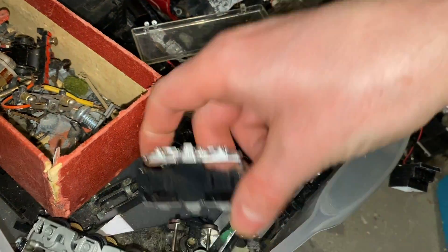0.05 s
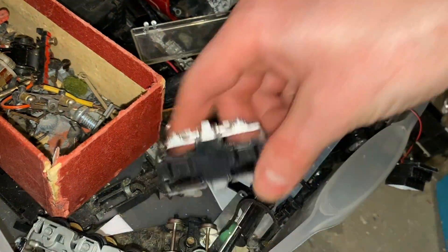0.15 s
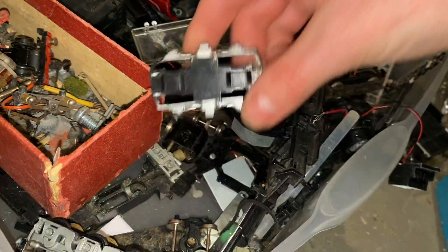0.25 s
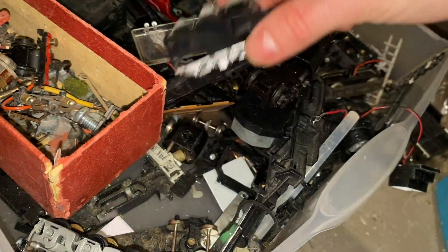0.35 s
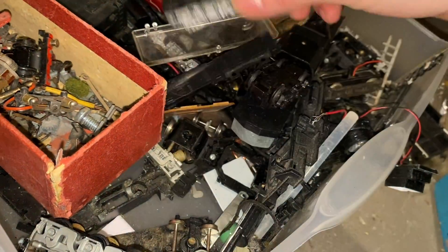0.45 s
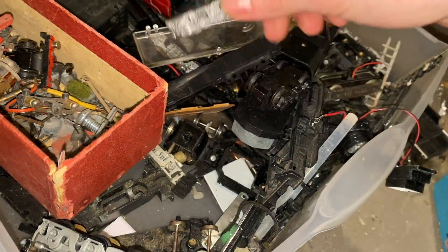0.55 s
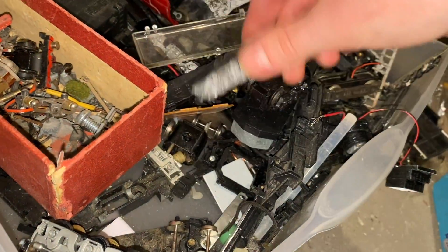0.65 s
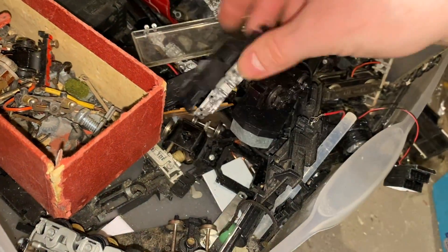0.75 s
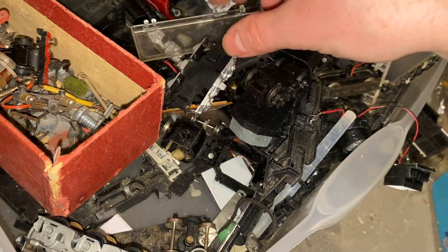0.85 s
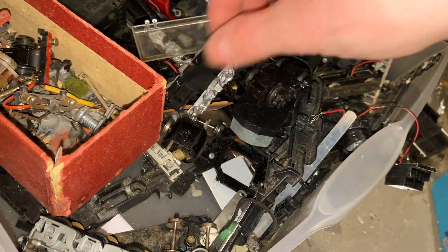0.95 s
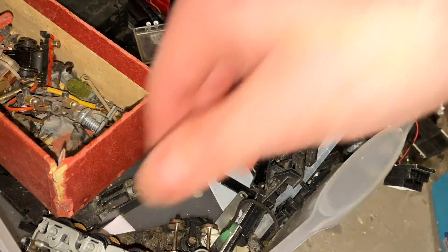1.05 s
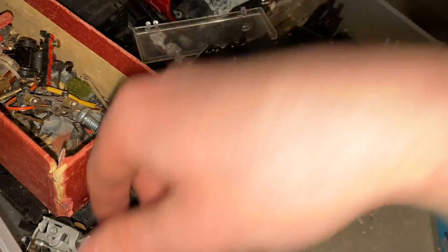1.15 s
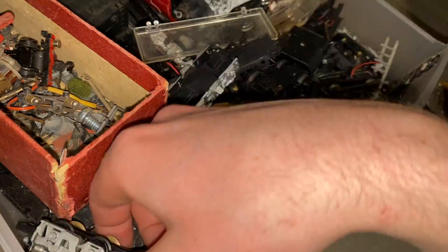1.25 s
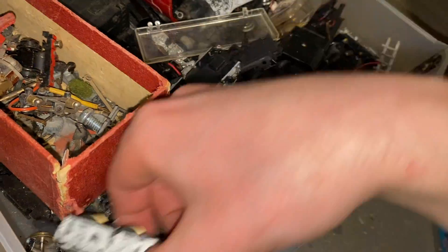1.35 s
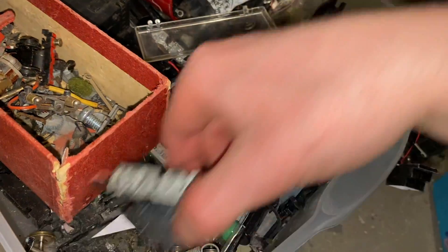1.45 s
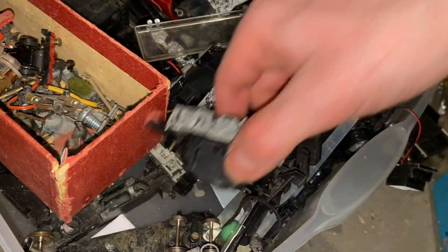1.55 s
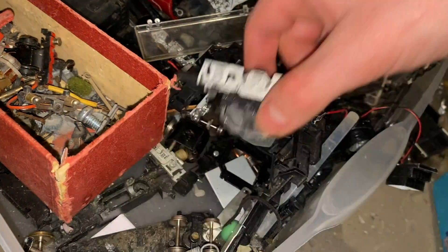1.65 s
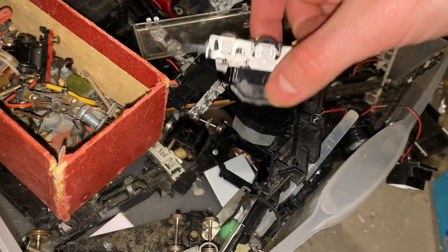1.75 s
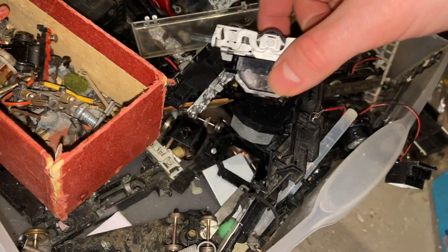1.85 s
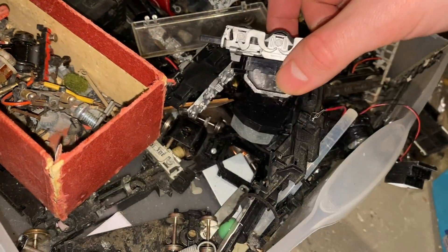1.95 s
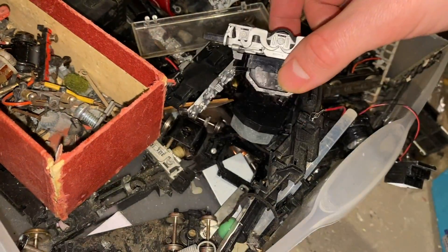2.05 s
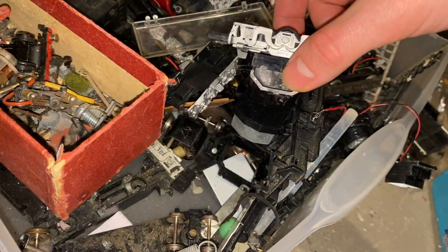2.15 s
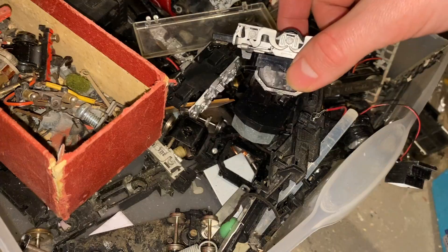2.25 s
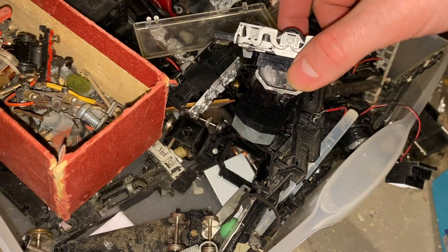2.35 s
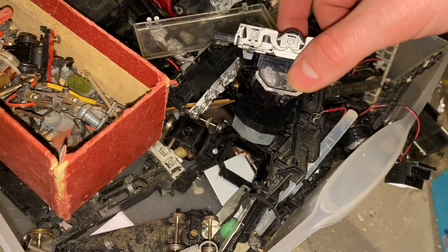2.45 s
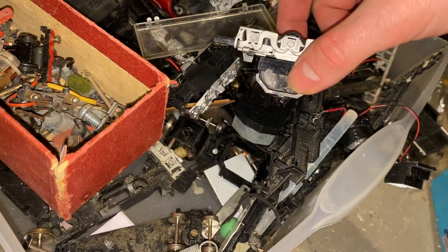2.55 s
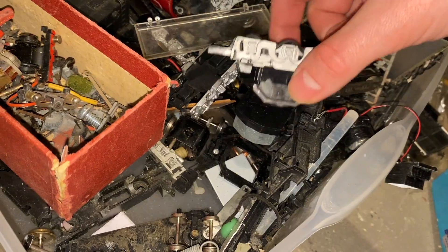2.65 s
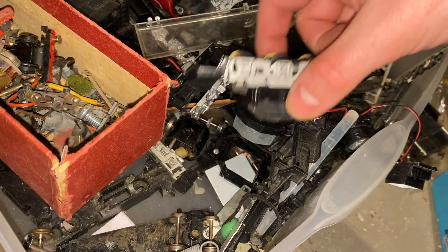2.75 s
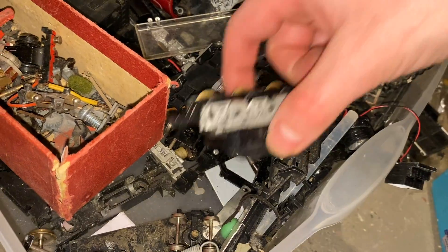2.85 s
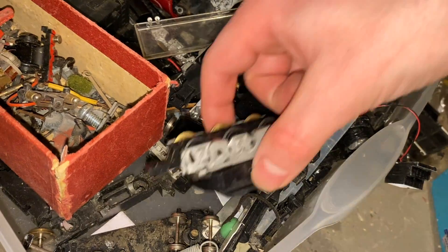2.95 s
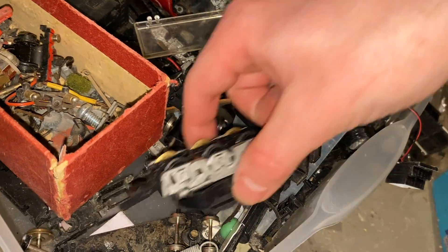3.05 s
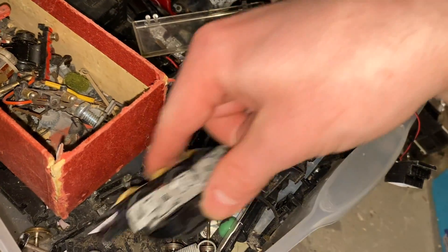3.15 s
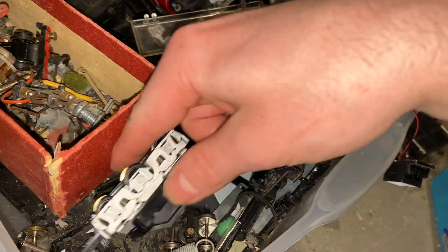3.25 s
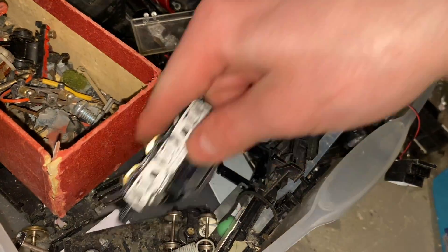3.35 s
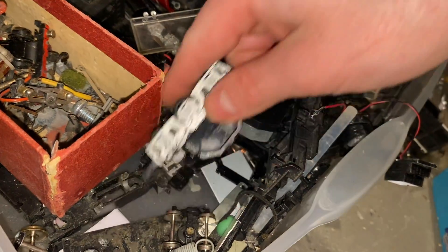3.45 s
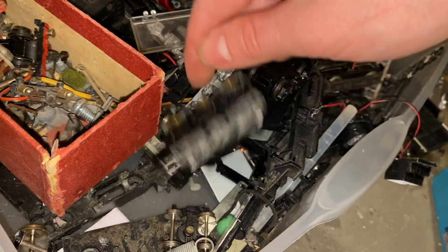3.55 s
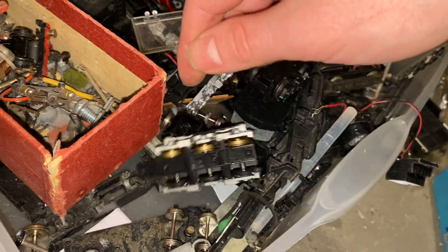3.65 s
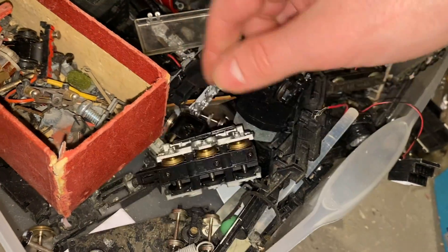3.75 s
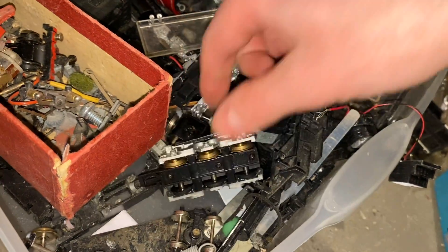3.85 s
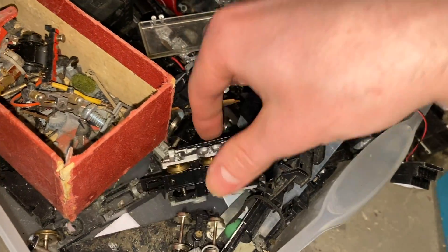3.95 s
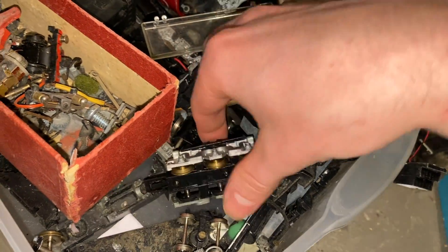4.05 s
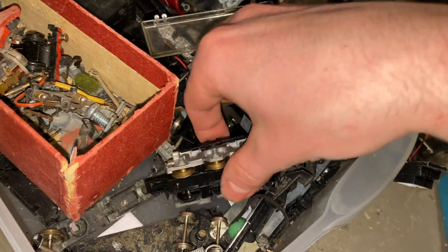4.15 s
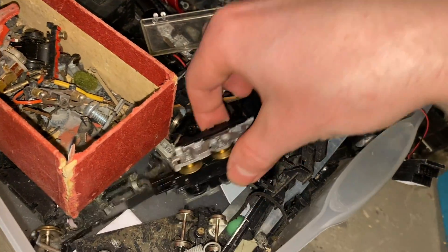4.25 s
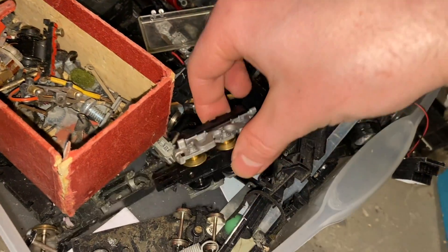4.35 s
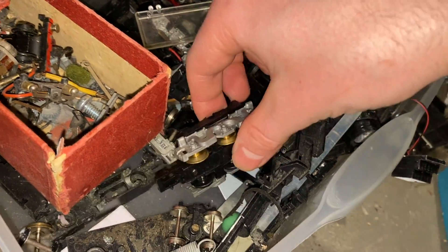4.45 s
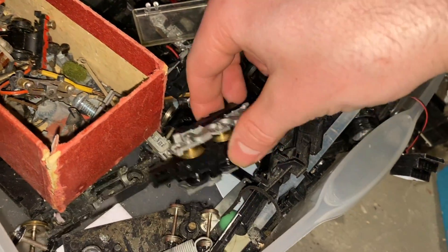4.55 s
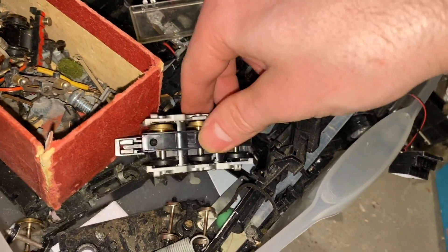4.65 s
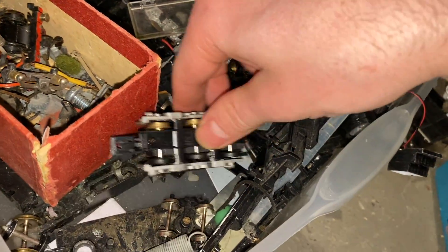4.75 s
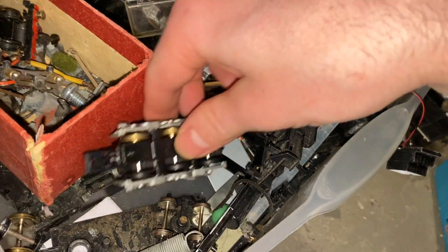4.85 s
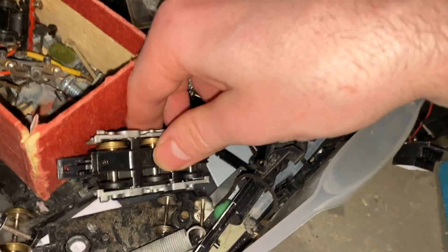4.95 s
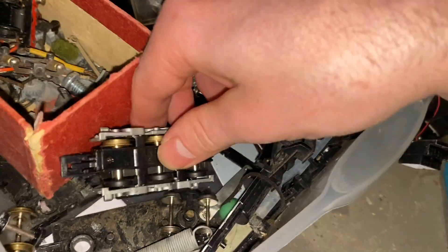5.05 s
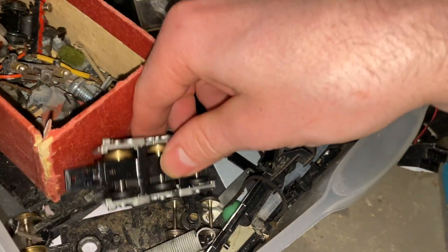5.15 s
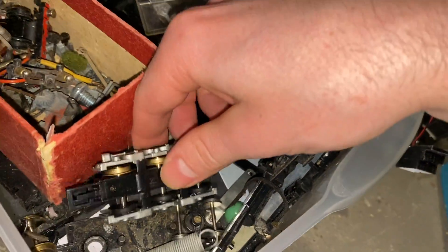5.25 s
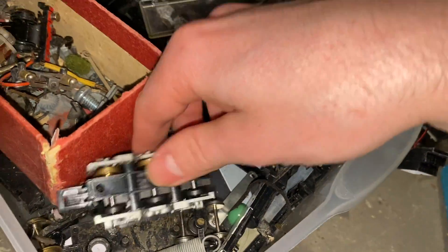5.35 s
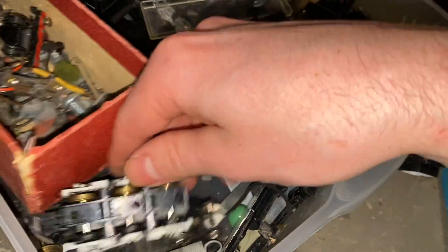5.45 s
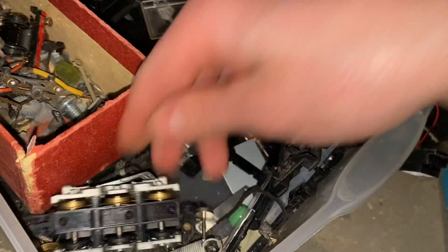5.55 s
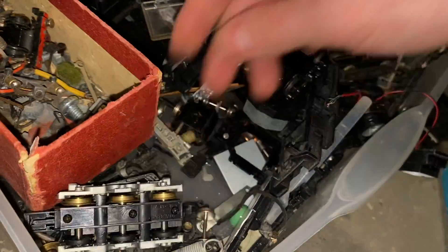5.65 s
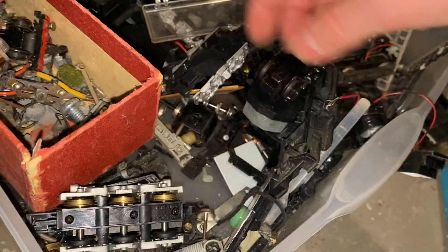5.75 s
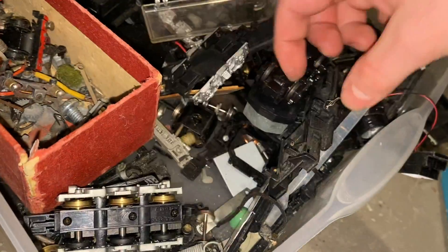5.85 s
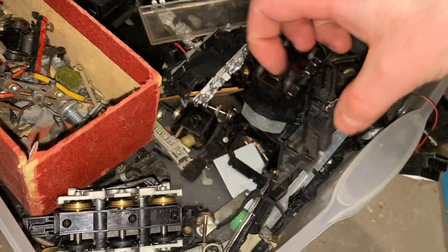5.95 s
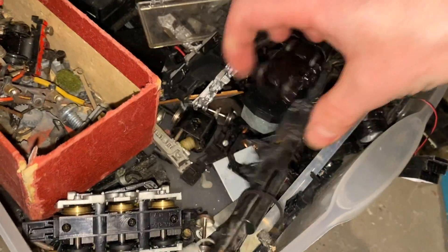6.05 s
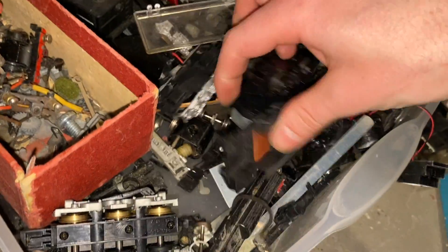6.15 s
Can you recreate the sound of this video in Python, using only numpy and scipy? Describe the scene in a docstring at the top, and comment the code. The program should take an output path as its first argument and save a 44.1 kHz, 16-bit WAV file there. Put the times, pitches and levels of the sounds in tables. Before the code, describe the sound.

A hand rummages through a bin of small plastic parts, clattering and sliding, with metal wheels chinking and one hard knock midway.

```python
"""Over low rumble, hum and hiss in a small quiet room, a hand rummages in a plastic bin of small parts.
First plastic pieces clatter and slide, a strip is flicked, and loose metal wheels begin to chink.
After a lull of over a second a model-train wheel unit is set down hard at about 3.5 s; a panel hums on.
Sparse touches follow, then a dense flurry of plastic and wheels from about 5.2 s to the end.
Contacts excite decaying modes and noise bursts; strokes add stick-slip friction; the room reverberates."""
import sys
import numpy as np
from scipy import signal
from scipy.fft import rfft, irfft, next_fast_len
from scipy.io import wavfile
from scipy.ndimage import uniform_filter1d

SR = 44100
rng = np.random.default_rng(int(sys.argv[2]) if len(sys.argv) > 2 else 0)


def dump(signal):
    """Clip the signal to [-1, 1] and save it as 16-bit WAV at the path in sys.argv[1]."""
    limited = np.clip(np.atleast_2d(signal).T, -1, 1)
    pcm = np.round(limited * 32767).astype(np.int16)
    wavfile.write(sys.argv[1], SR, pcm)


N = 274302
T = np.arange(SR // 5) / SR  # time within one contact [s]
BLOW = SR // 100  # a contact's level is its rms over these first samples (10 ms)


def amp(db):
    """Level to amplitude: 20 dB is a factor of ten."""
    return 10 ** (np.asarray(db) / 20)


def unit(x):
    """Normalisation by effective value: scale to rms 1."""
    return x / np.sqrt(np.mean(x ** 2) + 1e-20)


def blow(x):
    """Normalisation by onset: scale a contact so that its first 10 ms have rms 1."""
    return x / np.sqrt(np.mean(x[:BLOW] ** 2) + 1e-20)


def fade(t, t60):
    """Exponential damping: the amplitude falls by 60 dB in t60 seconds."""
    return np.exp(-np.log(1000) * t / t60)


def rise(t, attack):
    """Finite contact time: a contact builds up with the time constant attack [s]."""
    return 1 - np.exp(-t / attack)


def along(points, hz):
    """Logarithmic frequency scale: (Hz, value) points joined by straight lines on it."""
    f, v = np.transpose(points)
    return np.interp(np.log(hz + 1e-3), np.log(f), v)


def coloured(x, spectrum):
    """Linear filtering: x weighted by a (Hz, dB) curve, then scaled to rms 1."""
    m = next_fast_len(len(x) + SR // 5)  # zero padding against wrap-around
    gain = amp(along(spectrum, np.fft.rfftfreq(m, 1 / SR)))
    return unit(irfft(rfft(x, m) * gain, m)[:len(x)])


def add(track, s, sound):
    """Superposition: mix a sound in at time s [s]."""
    start = max(round(s * SR), 0)
    track[start:start + len(sound)] += sound[:max(len(track) - start, 0)]


def ring(modes, scatter_db, tilt_db=0, detune=0):
    """Modal superposition: damped modes of alternating sign, with new strengths and loading at each blow."""
    hz, db, t60 = np.transpose(modes)
    hz = hz * np.exp(detune * rng.standard_normal(len(hz)))
    sign = (-1) ** np.arange(len(hz))
    gain = amp(db + tilt_db + scatter_db * rng.standard_normal(len(hz))) * sign
    return gain @ (np.sin(2 * np.pi * hz[:, None] * T) * fade(T, t60[:, None]))


def rattled(modes, rattle_t60, detune, scatter_db=3):
    """Excitation by convolution: a loose piece rattles on its seat for a moment, feeding its modes."""
    rattle = rng.standard_normal(4 * BLOW) * fade(T[:4 * BLOW], rattle_t60)
    return blow(signal.fftconvolve(ring(modes, scatter_db, detune=detune), rattle))


# spectra of the low rumble and the thin hiss: (frequency [Hz], relative density [dB per Hz])
RUMBLE_SPECTRUM = [(2, 5), (6, 5), (16, 7), (32, -17), (55, -2.5), (85, -10), (130, -7), (168, -19.5),
                   (200, -18.5), (300, -26), (600, -31.5), (1200, -54.5), (3000, -86)]
HISS_SPECTRUM = [(200, -8), (600, 9.5), (1200, 7.5), (2500, 1), (5000, -1), (10000, -5.5), (16000, -7.5)]
# steady hum tones: (frequency [Hz], rms level [dB])
HUM_TONES = [(59.5, -56.5), (199, -65), (2724, -85)]


def background(rumble_db=-43.0, hiss_db=-69):
    """Stationary noise and pure tones: low room rumble, thin hiss and a faint hum."""
    t = np.arange(N) / SR
    hum = sum(amp(db) * np.sqrt(2) * np.sin(2 * np.pi * (hz * t + rng.random())) for hz, db in HUM_TONES)
    rumble = amp(rumble_db) * coloured(rng.standard_normal(N), RUMBLE_SPECTRUM)
    hiss = amp(hiss_db) * coloured(rng.standard_normal(N), HISS_SPECTRUM)
    return hum + rumble + hiss


# reverberation time of the room: (frequency [Hz], t60 [s])
ROOM_T60 = [(200, 0.097), (600, 0.36), (2000, 0.32), (7000, 0.22), (15000, 0.14)]
# strength of its reply to the direct sound: (frequency [Hz], gain [dB])
ROOM_REPLY = [(200, -9.5), (600, -8.5), (1300, -8), (2500, -13), (7000, -14.5), (15000, -17.5)]


def room(x, delay=.008, order=10):
    """Reverberation as decaying noise: the walls answer, a little differently as the hand moves about."""
    hop = N // order // 2
    window = signal.windows.hann(2 * hop, sym=False)
    padded = np.pad(x, (hop, 3 * hop))
    wet = np.zeros(len(padded))
    # overlapping stretches of sound each get a new random tail
    for start in range(0, N + hop, hop):
        hz, t, z = signal.stft(rng.standard_normal(SR // 2), SR, nperseg=256)
        decay = fade(t, along(ROOM_T60, hz)[:, None])
        energy = np.mean(decay ** 2, axis=1, keepdims=True) * SR / 2
        decay *= amp(along(ROOM_REPLY, hz))[:, None] / np.sqrt(energy)
        tail = signal.istft(z * decay, SR, nperseg=256)[1]
        stretch = padded[start:start + 2 * hop] * window
        add(wet, start / SR + delay, signal.fftconvolve(stretch, tail))
    return wet[hop:hop + N]


STROKE_EDGE_DB = -10.5  # a stroke starts and ends this far under its peak


def pressure_db(t, swell_s, fade_s):
    """Friction grows with load: the hand presses harder, then lets go; t counts from the stroke's start."""
    return STROKE_EDGE_DB * np.maximum(1 - t / swell_s, (t - swell_s) / fade_s)


def jostle(spread_db=3, t60=0.017, low_hz=700, high_hz=6000, count=8000):
    """Granular superposition: countless tiny contacts, each ringing one short mode of some piece."""
    hz = low_hz * (high_hz / low_hz) ** rng.random((count, 1))
    t = T[:2 * BLOW]
    # high modes lie further apart; their strength keeps the spectrum even
    size = amp(spread_db * np.clip(rng.standard_normal((count, 1)), -2, 2)) * np.sqrt(hz)
    grains = size * np.sin(2 * np.pi * hz * t) * fade(t, t60)
    at = rng.integers(0, N, (count, 1)) + np.arange(len(t))
    return np.bincount(at.ravel(), grains.ravel(), N)[:N]


# spectrum of plastic rubbing on plastic: (frequency [Hz], relative density [dB per Hz])
RASP_SPECTRUM = [(500, -20.5), (900, 1.5), (1700, 5.5), (2600, 6), (4500, 4.5), (8000, 2), (12000, -3.5),
                 (16000, -22)]
# plastic pieces slide over each other:
# (start [s], swell [s], fade [s], bin gain at peak [dB], rasp gain at peak [dB])
SLIDES = [(0.0, 0.031, .1, -43, -46), (0.21, 0.068, 0.026, -58, -57), (0.61, 0.16, 0.15, -52.5, -55.5),
          (3.21, .05, 0.038, -61, -59.5), (4.74, 0.026, 0.069, -61, -65), (5.03, .07, .1, -47.5, -60),
          (5.86, 0.15, .06, -46, -48.5), (6.03, 0.12, 0.05, -35.5, -38)]
# the wheel unit is dragged across them: the same columns
DRAGS = [(1.18, 0.083, 0.042, -44, -54.5), (1.359, 0.054, 0.11, -45, -45.5),
         (3.335, 0.035, 0.032, -61.5, -59.5), (3.48, 0.054, 0.097, -43, -38.5),
         (5.23, 0.07, 0.087, -48.5, -52.5), (5.36, 0.043, 0.14, -40, -43)]


def scrapes(slips_per_s=700, spread_db=4, slip_t60=0.06, jostle_db=-1, friction_db=-3):
    """Stick-slip friction: sliding pieces hiss, jostle each other and drum faintly on the bin."""
    t, out = np.arange(N) / SR, np.zeros(N)
    slipping = rng.random(N) < slips_per_s / SR
    slips = slipping * amp(spread_db * rng.standard_normal(N)) * rng.choice([-1, 1], N)
    # each slip leaves a burst of friction noise that dies away
    grip = np.sqrt(np.abs(signal.fftconvolve(slips ** 2, fade(T, slip_t60) ** 2)[:N]))
    friction = coloured(grip * rng.standard_normal(N), RASP_SPECTRUM)
    rasp = amp(jostle_db) * coloured(jostle(), RASP_SPECTRUM) + amp(friction_db) * friction
    # in the drumming the bin's modes are tilted upwards by 2.9 dB per octave
    tilt_db = 2.9 * np.log2(np.array(BIN_MODES)[:, 0])
    body = unit(signal.fftconvolve(slips, ring(BIN_MODES, scatter_db=6.5, tilt_db=tilt_db))[:N])
    for start, swell_s, fade_s, bin_db, rasp_db in SLIDES + DRAGS:
        on = (t >= start) & (t < start + swell_s + fade_s)
        pressure = amp(pressure_db(t[on] - start, swell_s, fade_s))
        pressure = uniform_filter1d(pressure, BLOW, mode="constant")  # soften the stroke's edges
        out[on] += pressure * (amp(bin_db) * body[on] + amp(rasp_db) * rasp[on])
    return out


# a thin plastic panel is jolted and hums on: (time [s], level [dB])
PANEL_HITS = [(3.159, -53), (3.512, -47), (3.539, -33.5), (4.567, -46.5)]
# its modes: (nominal frequency [Hz], mean relative level [dB], t60 [s])
PANEL_MODES = [(970, -3.5, 0.12), (990, 6, 0.16), (1090, -5, 0.22), (1120, -4, .2), (1220, -9.5, 0.39),
               (1343, 11.5, 0.17), (1415, -1.5, 0.17), (1463, -3, 0.36), (1520, 1, 0.21),
               (1640, -10.5, .12), (1740, -9.5, .1)]


def panel():
    """Plate resonance: a jolt rattles the thin panel, whose modes ring on."""
    out = np.zeros(N)
    for s, db in PANEL_HITS:
        add(out, s, amp(db) * rattled(PANEL_MODES, rattle_t60=0.031, detune=0.022))
    return out


# a long stiff strip is flicked and rings on: (time [s], level of its modes [dB])
STRIP_HITS = [(.771, -31), (0.836, -46), (5.892, -43), (5.935, -45.5)]
# its modes: (frequency [Hz], mean relative level [dB], t60 [s])
STRIP_MODES = [(1610, -1.5, 0.08), (1770, -8.5, 0.21), (1760, -19, 0.055), (1714, -9, 0.066),
               (2220, -13, 0.18), (2480, -4, 0.043), (2558, -3.5, 0.13), (2586, -0.5, 0.058),
               (3290, -33, 0.056), (3650, -16, 0.093), (4140, -10, 0.084), (5190, -13, 0.16),
               (6400, -11.5, 0.1), (7870, -11, 0.066), (8500, -22, .05), (11200, -23, .05)]


def strip(neighbours_db=-7):
    """Bar vibration with contact buzz: the flicked strip quivers against the pieces that it lies on."""
    out = np.zeros(N)
    for s, db in STRIP_HITS:
        buzz = blow(coloured(rng.standard_normal(len(T)), RASP_SPECTRUM) * fade(T, t60=0.11))
        add(out, s, amp(db) * (blow(ring(STRIP_MODES, scatter_db=3.5)) + amp(neighbours_db) * buzz))
    return out


# an axle rings when the unit lands: (time [s], level [dB])
AXLE_HITS = [(3.540, -48), (5.358, -29.5), (5.412, -56)]
# its single mode: (frequency [Hz], relative level [dB], t60 [s])
AXLE_MODES = [(5108, 0, .09)]


def axle():
    """Free decay of a single mode: the metal axle rings after its blow."""
    out = np.zeros(N)
    for s, db in AXLE_HITS:
        add(out, s, amp(db) * blow(ring(AXLE_MODES, scatter_db=1)))
    return out


# modes of the loaded bin: (nominal frequency [Hz], relative level before weighting [dB], t60 [s])
BIN_MODES = [(201, -17.5, 0.042), (247, 0.5, 0.039), (285, 0.5, 0.059), (352.6, 4, 0.033),
             (422.7, -0.5, 0.064), (496.4, -0.5, 0.049), (668, -1, 0.045), (736, 0.5, 0.042),
             (843.6, 0.5, 0.043), (984.4, -8.5, 0.048)]


def knock(centre_hz, focus_db=9.5, attack=0.00042, cut_hz=170):
    """Modal excitation by impact: the bin modes near a centre pitch, set by where the piece lands, dominate."""
    octaves = np.log2(np.array(BIN_MODES)[:, 0] / centre_hz)
    modes = ring(BIN_MODES, scatter_db=1.5, tilt_db=-focus_db * octaves ** 2, detune=.025)
    low_cut = signal.butter(3, cut_hz, "high", fs=SR, output="sos")  # the knock carries little deep bass
    return blow(signal.sosfilt(low_cut, modes * rise(T, attack)))


def clack(centre_hz, focus_db=2.5, t60=0.042, low_hz=950, high_hz=7500, attack=0.00043, count=60):
    """Dense modal response: each plastic piece has its own short modes, strongest around its pitch."""
    hz = low_hz * (high_hz / low_hz) ** ((np.arange(count) + rng.random(count)) / count)
    # high modes tend to die sooner
    life = t60 * (hz / centre_hz) ** -.3 * np.exp(.35 * rng.standard_normal(count))
    gain = amp(-focus_db * np.log2(hz / centre_hz) ** 2)
    t = T[:len(T) // 2]
    waves = np.sin(2 * np.pi * (hz[:, None] * t + rng.random((count, 1))))
    modes = gain @ (waves * fade(t, life[:, None]))
    return np.pad(blow(modes * rise(t, attack)), (0, len(T) - len(t)))


def chatter(x, span, rebound, count=3):
    """Repeated impact: a light piece rebounds a few times within milliseconds of touching."""
    out = x.copy()
    for when, size in rng.random((count, 2)):
        add(out, span * when, rebound * (2 * size - 1) * x)
    return out


# snap of a plastic edge and of a metal one: (frequency [Hz], mean relative density [dB per Hz])
PLASTIC_EDGE = [(2500, -28), (4500, -1.5), (6500, 2.5), (8500, 2), (11000, -3), (13500, -3), (16000, -21.5)]
METAL_EDGE = [(2500, -28.5), (4500, -7.5), (6500, -4.5), (8200, 1.5), (10500, -7.5), (13200, 0.5),
              (14500, -7), (16000, -8)]


def tick(spectrum, t60=0.027, after_db=-21, after_t60=0.13, attack=0.00057, count=22):
    """Broadband impact noise: hard edges snap and rebound, and neighbouring pieces shiver briefly."""
    # each snap has its own colour
    hz = np.linspace(spectrum[0][0], spectrum[-1][0], count)
    own_db = along(spectrum, hz) + 3 * rng.standard_normal(count)
    snap = chatter(fade(T, t60) * rise(T, attack), span=0.0051, rebound=0.76)
    shiver = amp(after_db) * fade(T, after_t60) * rise(T, attack)
    return blow(coloured(rng.standard_normal(len(T)), np.c_[hz, own_db]) * (snap + shiver))


# the harder the edge (tick over clack), the higher the clack
CLACK_HZ, BRIGHTEN_OCT_PER_DB = 3130, 0.0961


def touch(knock_db, knock_hz, clack_db, tick_db, edge, count):
    """Coupled impact: a touch sounds the bin, a plastic piece of count modes and its edge together."""
    clack_hz = CLACK_HZ * 2 ** (BRIGHTEN_OCT_PER_DB * (tick_db - clack_db))
    bin_and_piece = amp(knock_db) * knock(knock_hz) + amp(clack_db) * clack(clack_hz, count=count)
    return bin_and_piece + amp(tick_db) * tick(edge)


# the wheels differ a little, so each of their two modes is a cluster:
# (nominal frequency [Hz], mean relative level [dB], t60 [s])
WHEEL_LOW_MODES = [(7600, 0, 0.072), (7800, 1, 0.085), (8010, -17.5, 0.047), (7990, 4, 0.048),
                   (8350, -6.5, 0.035)]
WHEEL_HIGH_MODES = [(12650, 8, .03), (13054, -21, .05), (12900, -4.5, .06), (13320, -1.5, 0.075),
                    (13800, -12, .03)]
LOWER_RING_DB = -2.5  # lower cluster over the upper, for knocks of JOLT_DB or more
JOLT_DB, LOWER_RING_GROWS = -27, .4  # below that knock the lower one weakens [dB per dB of knock]


def jingle(ring_db, knock_db):
    """Split modes: the loose wheels chink in two clusters; light jolts sound mostly the upper one."""
    lower_db = ring_db + LOWER_RING_DB + LOWER_RING_GROWS * min(knock_db - JOLT_DB, 0)
    lower = amp(lower_db) * rattled(WHEEL_LOW_MODES, rattle_t60=0.016, detune=0.0047)
    upper = amp(ring_db) * rattled(WHEEL_HIGH_MODES, rattle_t60=0.029, detune=0.0047)
    return lower + upper


CATCHES_PER_S, CATCH_SPREAD_DB = 50, 3.5  # sliding pieces catch on each other
CATCH_KNOCK_DB = -6  # over the stroke's bin gain
CATCH_CLACK_DB, CATCH_TICK_DB, CATCH_RING_DB = -1.5, -2.5, -3.5  # over its rasp gain
CATCH_HZ = 700  # centre pitch of the catches' faint knocks on the bin


def catches(strokes):
    """Random asperity contact: rows of (s, knock dB, knock Hz, clack dB, tick dB, wheel ring dB)."""
    rows, count = [], 32  # more than the longest stroke needs
    for start, swell_s, fade_s, bin_db, rasp_db in strokes:
        times = (np.arange(count) + rng.random(count)) / CATCHES_PER_S
        chance_db = CATCH_SPREAD_DB * rng.standard_normal((count, 4))
        peak_db = np.array([bin_db + CATCH_KNOCK_DB, rasp_db + CATCH_CLACK_DB,
                            rasp_db + CATCH_TICK_DB, rasp_db + CATCH_RING_DB])
        for t, own_db in zip(times[times < swell_s + fade_s], chance_db):
            knock_db, *edge_db = peak_db + own_db + pressure_db(t, swell_s, fade_s)
            rows.append((start + t, knock_db, CATCH_HZ, *edge_db))
    return rows


# plastic pieces touch:
# (time [s], knock level [dB], knock centre [Hz], clack level [dB], tick level [dB])
PART_TOUCHES = [(0.015, -26, 435, -31.5, -41.5), (0.041, -51, 548, -68, -44),
                (0.097, -39.5, 670, -40, -41.5), (0.184, -41, 606, -44, -52), (0.233, -43.5, 550, -52, -69),
                (0.289, -46.5, 473, -64, -53.5), (0.608, -44.5, 520, -38.5, -39),
                (0.654, -49.5, 610, -45, -56), (0.688, -54, 540, -43, -41.5),
                (0.729, -49.5, 500, -46.5, -46.5), (0.771, -41, 615, -39, -42.5),
                (0.88, -48.5, 590, -47, -51), (1.141, -59, 485, -64.5, -52.5),
                (1.178, -45.5, 700, -58, -49), (1.266, -33, 654, -36, -36.5), (1.293, -48, 670, -53, -44.5),
                (1.4, -58, 640, -43.5, -49), (1.431, -48, 850, -38.5, -45), (1.531, -54, 510, -49, -50),
                (1.561, -44.5, 610, -50.5, -48.5), (3.036, -78, 400, -81, -53), (3.146, -77, 400, -54, -37),
                (3.161, -49, 590, -40.5, -68.5), (3.48, -53, 652, -36.5, -36),
                (3.837, -38.5, 640, -55, -54), (3.953, -72, 590, -51.5, -57.5),
                (4.048, -52.5, 700, -52.5, -55), (4.08, -43.5, 530, -56.5, -64),
                (4.186, -22.5, 576, -29, -37), (4.203, -30, 562, -45, -59.5), (4.342, -60, 475, -67, -56.5),
                (4.567, -38.5, 510, -34.5, -41), (4.863, -39.5, 567, -48.5, -54.5),
                (5.054, -53.5, 580, -57, -59), (5.183, -38, 530, -49.5, -57), (5.393, -36, 642, -46, -40.5),
                (5.558, -51, 690, -46, -45.5), (5.752, -55.5, 576, -46.5, -44), (5.776, -38, 710, -39, -52),
                (5.854, -49, 580, -44.5, -44.5), (5.873, -35.5, 740, -37, -48),
                (5.896, -29, 756, -43.5, -64), (5.975, -39.5, 751, -36, -35), (6.037, -44, 666, -39.5, -41),
                (6.048, -41.5, 781, -50, -39.5), (6.072, -45, 660, -46, -39), (6.097, -34.5, 500, -41, -61),
                (6.127, -34.5, 800, -50, -46.5), (6.146, -36, 815, -35, -34.5),
                (6.215, -26.5, 684, -32, -48.5)]
# the wheel unit touches: the same columns, then (upper wheel ring level [dB])
WHEEL_TOUCHES = [(1.358, -42.5, 575, -38.5, -44, -37), (1.386, -47, 550, -62, -50.5, -46),
                 (1.49, -64, 620, -52, -48.5, -51), (1.633, -66, 430, -68, -65, -66),
                 (3.43, -76, 503, -67, -51.5, -55), (3.451, -67, 404.5, -72, -50.5, -45),
                 (3.464, -52, 480, -54, -44, -41), (3.487, -41, 560, -32, -28.5, -29.5),
                 (3.51, -12.5, 424, -28.5, -36, -29.5), (3.516, -22, 650, -25, -33, -42),
                 (3.539, -30, 700, -30, -20, -26), (3.553, -18.5, 430, -26.5, -32, -27),
                 (3.58, -45, 480, -55, -32, -43), (3.598, -30, 730, -35.5, -46.5, -39),
                 (3.615, -32.5, 515, -38, -46, -38), (3.85, -39.5, 780, -51, -50.5, -50),
                 (4.019, -50, 540, -57, -52, -50), (4.576, -44, 590, -46, -34, -30.5),
                 (4.671, -78, 403, -63, -43, -49), (4.877, -25.5, 574, -36.5, -40.5, -47.5),
                 (5.251, -40.5, 655, -49, -50.5, -59), (5.27, -53, 557, -54, -42, -41.5),
                 (5.358, -24.5, 773, -28, -29.5, -43), (5.362, -24, 666, -39, -29, -36),
                 (5.412, -32, 650, -31, -29.5, -42.5), (5.423, -27, 583, -37, -35, -32),
                 (5.447, -35, 705, -59, -38.5, -37.5), (5.486, -42.5, 560, -57, -41.5, -57),
                 (5.511, -37, 706, -44, -40, -53)]


def contacts(parts, wheels, count):
    """Impact by material: plastic pieces only clatter; the wheel unit has metal edges and chinks as well."""
    out = np.zeros(N)
    for s, knock_db, knock_hz, clack_db, tick_db, *_ in parts:
        add(out, s, touch(knock_db, knock_hz, clack_db, tick_db, PLASTIC_EDGE, count))
    for s, knock_db, knock_hz, clack_db, tick_db, ring_db in wheels:
        add(out, s, touch(knock_db, knock_hz, clack_db, tick_db, METAL_EDGE, count))
        add(out, s, jingle(ring_db, knock_db))
    return out


def scene():
    """Direct plus reverberant field: the bin close by, its room and the background."""
    floor = background()
    resonances = panel() + strip() + axle()
    # a blow jolts many pieces, a catch only one with few modes
    light = contacts(catches(SLIDES), catches(DRAGS), count=12)
    blows = contacts(PART_TOUCHES, WHEEL_TOUCHES, count=60)
    near = scrapes() + resonances + light + blows
    return (near + room(near) + floor)[None]


TOP_HZ = 16000


def record(dry):
    """Band limitation: nothing at or above TOP_HZ is kept."""
    m = next_fast_len(N + SR // 2)
    kept = np.fft.rfftfreq(m, 1 / SR) < TOP_HZ
    return irfft(rfft(dry, m) * kept, m)[..., :N]


dry = scene()
out = record(dry)
dump(out)
```